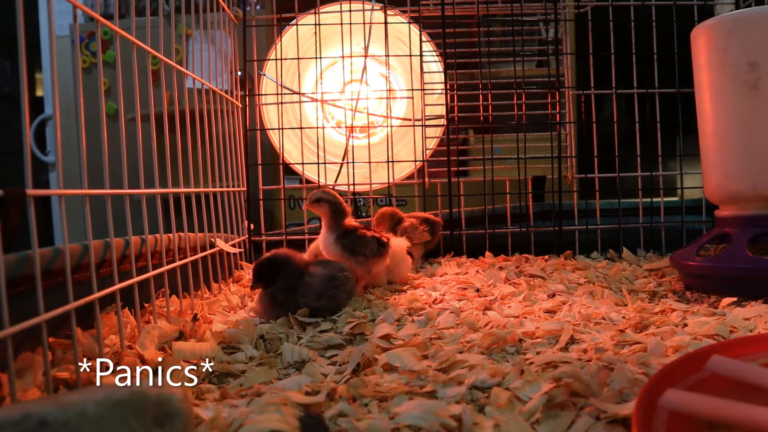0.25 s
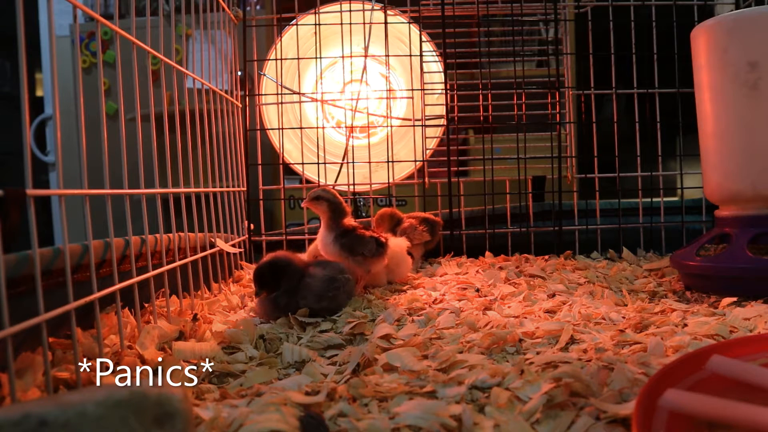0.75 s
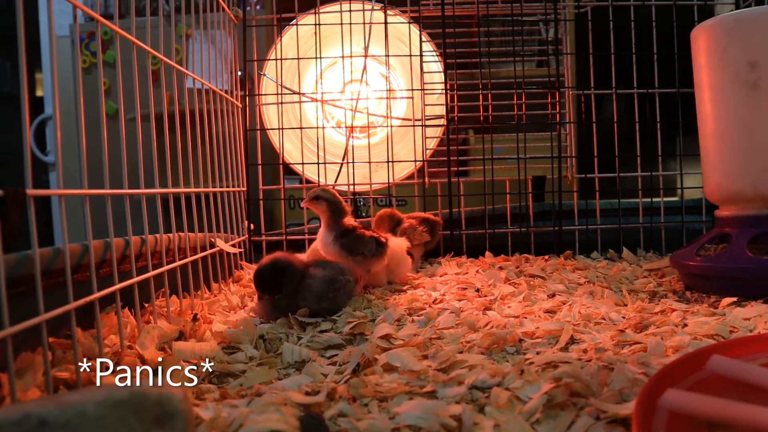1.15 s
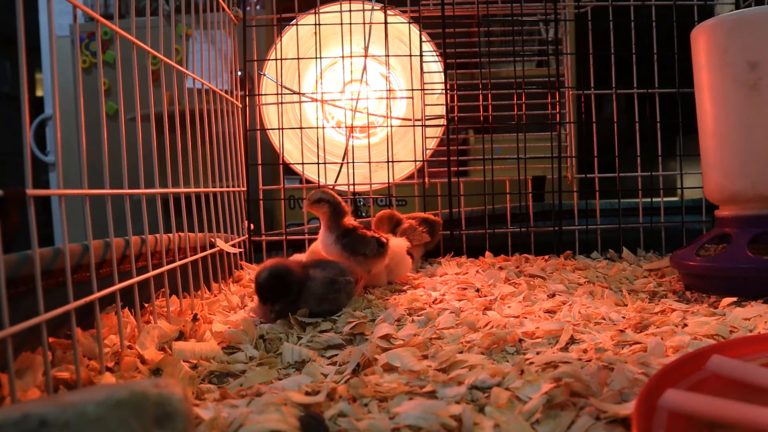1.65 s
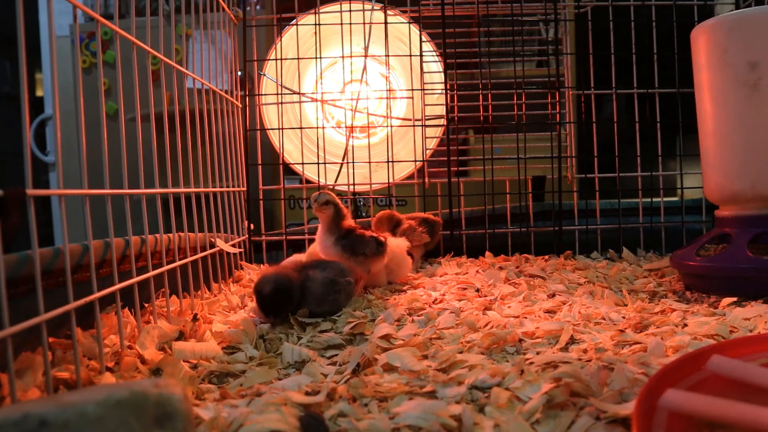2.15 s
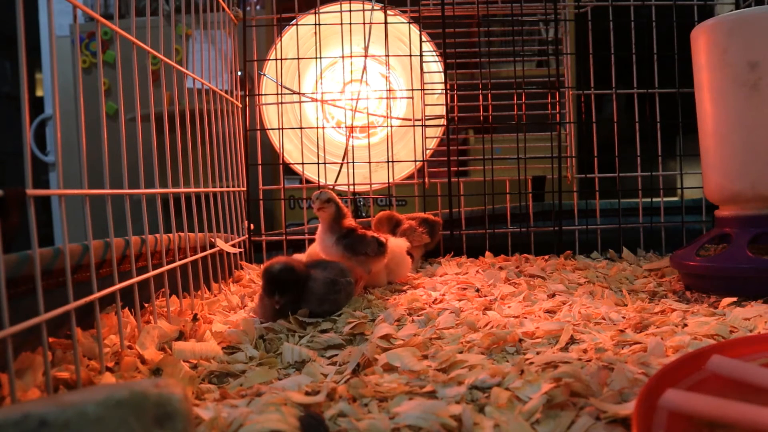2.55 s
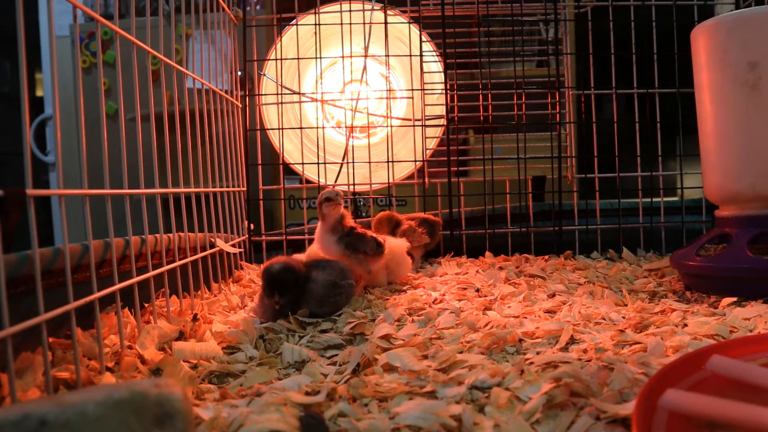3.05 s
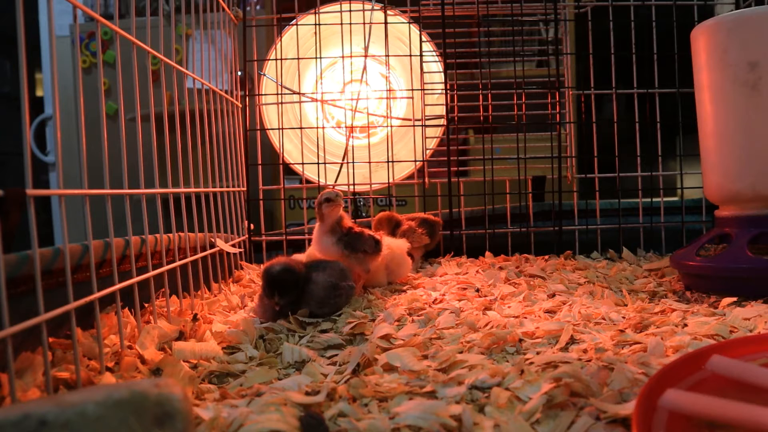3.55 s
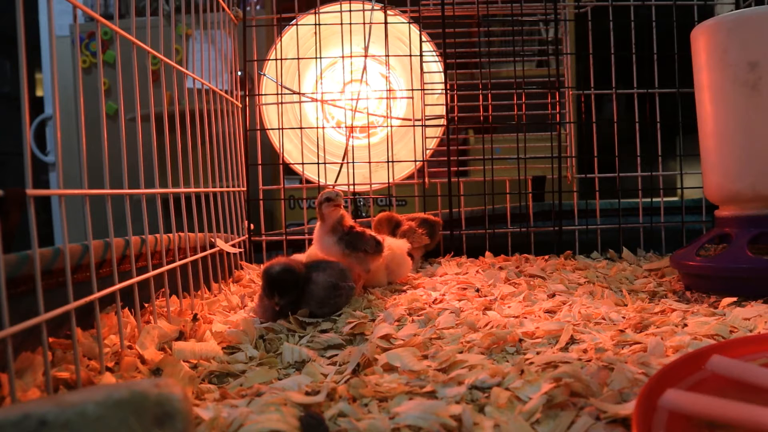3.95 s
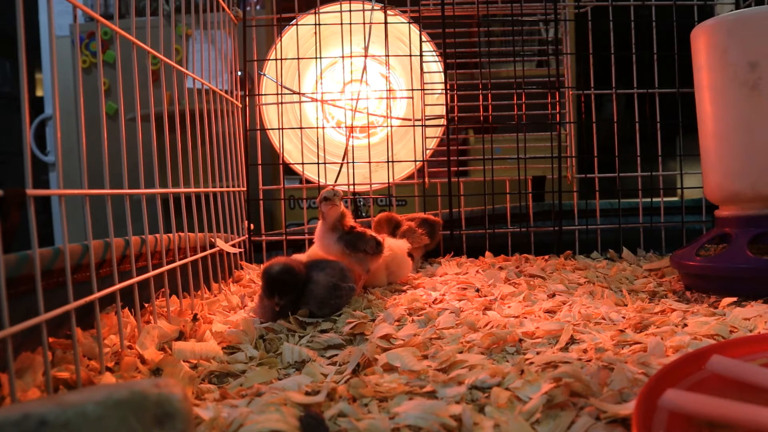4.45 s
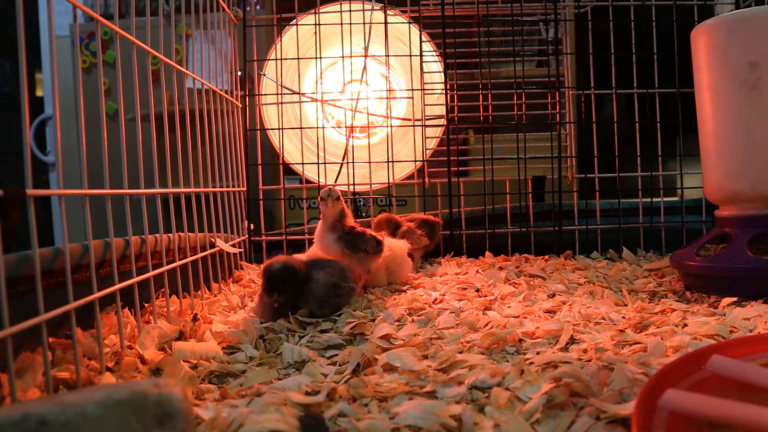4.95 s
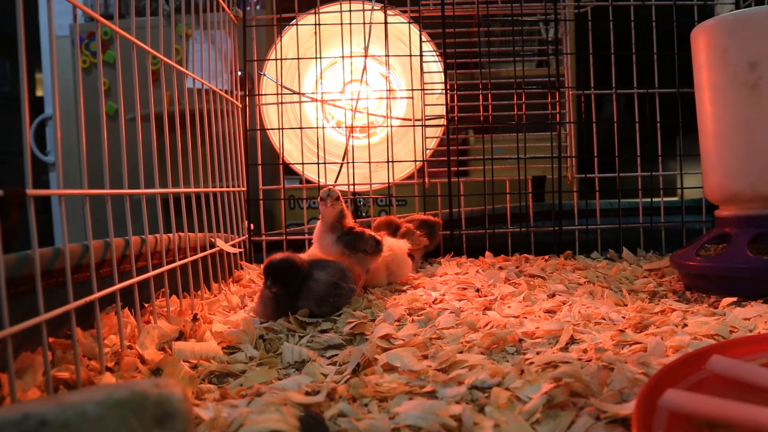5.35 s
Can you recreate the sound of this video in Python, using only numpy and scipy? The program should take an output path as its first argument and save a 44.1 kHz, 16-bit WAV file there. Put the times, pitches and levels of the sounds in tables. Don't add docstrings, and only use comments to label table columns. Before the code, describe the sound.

A faint low fan hum with mains tones opens the scene, and a tiny bedding tick and a soft distant cluck come at 0.3 s. The first loud chick peep arrives at about 0.5 s, then others near 0.8, 1.4 and 1.85 s. From 2.2 s they come steadily, about every third of a second, until 4.6 s, with the last two at 5.05 and 5.4 s. Each lasts around a tenth of a second: a thin, reedy two-toned start near 6 kHz, a swift slide to a strong whistle around 4.5 kHz, then an abrupt downward snap. Later peeps sound brighter and fall deeper. Short echoes and a brief tail suggest a small indoor enclosure. Very faint hen clucks occur near 0.7-0.9, 1.75, 2.5 and 5 s; dry shavings tick around 2.2, 2.9, 3.0 and 5.1 s. The hum dips slightly after each peep.

```python
import sys
import numpy as np
from scipy import signal
from scipy.fft import rfft, irfft, next_fast_len
from scipy.io import wavfile
from scipy.ndimage import uniform_filter1d

SR = 44100
rng = np.random.default_rng(int(sys.argv[2]) if len(sys.argv) > 2 else 0)


def volts_from_db(level):
    exponent = np.asarray(level, float) / 20
    return 10 ** exponent


def file_out(sig):
    cols = np.atleast_2d(sig).T
    lim = np.clip(cols, -1, 1)
    pcm = np.round(lim * 32767).astype(np.int16)
    wavfile.write(sys.argv[1], SR, pcm)


N = 246959


def rms_one(x):
    return x / np.sqrt(np.mean(x ** 2) + 1e-20)


def in_time(rows, t):
    first, *columns = np.transpose(rows)
    return [np.interp(t, first, c) for c in columns]


def at_hz(points, hz):
    table = np.array(points)
    return np.interp(np.log(hz), np.log(table[:, 0]), table[:, 1])


def filtered(order, hz, kind, x):
    return signal.sosfilt(signal.butter(order, hz, kind, fs=SR, output="sos"), x)


def drift(rate_hz, size):
    r = np.exp(-2 * np.pi * rate_hz / SR)
    run_in = int(SR / rate_hz)
    noise = rng.standard_normal(size + run_in)
    return rms_one(signal.lfilter([1], [1, -2 * r, r * r], noise)[run_in:])


# frequency in Hz, density in dB per Hz.
FAN_SPECTRUM = [(15, -54), (25, -34.5), (55, -5.5), (86, -18), (113, -5), (178, -9.5), (221, -4),
                (289, -10), (469, -10.5), (684, -26.5), (804, -19), (4260, -27.5), (10100, -41.5),
                (15500, -72.5)]
# frequency in Hz, likeness from -1 to 1.
LIKENESS = [(60, 0.93), (130, 0.94), (290, 0.87), (640, 0.12), (1410, -0.43), (3100, -0.5), (6820, -0.53),
            (15000, -0.57)]


def fan(patchy_db):
    out = 0
    edges_hz = 22 * 2 ** np.arange(0, 9.6, .5)
    white = rng.standard_normal((2, 2, N))
    flicker = [drift(27, N), drift(5, N), drift(20, N)]
    for k, (low, high) in enumerate(zip(edges_hz, edges_hz[1:])):
        mid, side = filtered(2, [low, high], "band", white[k % 2])
        hz = np.sqrt(low * high)
        alike = np.clip(at_hz(LIKENESS, hz), -1, 1)
        gain = volts_from_db(at_hz(FAN_SPECTRUM, hz) + patchy_db * flicker[k % 3])
        out = out + gain * (np.sqrt(1 + alike) * mid + np.sqrt(1 - alike) * side * [[1], [-1]])
    return rms_one(out)


# frequency in Hz, level in dB.
HUM_TONES = [(59.2, -65.5), (118.4, -54), (220.7, -53), (473.7, -65)]


def hum(wander_db):
    t = np.arange(N) / SR
    out = 0
    for hz, db in HUM_TONES:
        level = volts_from_db(db + wander_db * drift(1.8, N))
        out = out + np.sqrt(2) * level * np.sin(2 * np.pi * hz * t)
    return out


BACKGROUND_DB, SINK_DB, RECOVER_S = -46, 1.68, 0.95


def background_db():
    since_s = np.arange(N) / SR - np.array(PEEPS)[:, 1:2]
    sink = (since_s > 0) * np.exp(-np.abs(since_s) / RECOVER_S)
    return BACKGROUND_DB - SINK_DB * np.sum(sink, axis=0)


# start in seconds, length in seconds, pitch in Hz, level in dB, left share 0-1.
CLUCKS = [
    (0.302, .07, 802, -55, 0.3),
    (0.719, .06, 730, -56.5, 0.4),
    (0.819, .09, 715, -55.5, .5),
    (1.753, .14, 707, -58.5, .8),
    (2.523, .11, 711, -57.5, .8),
    (2.54, .1, 814, -57.5, .6),
    (4.956, .08, 557, -61, 0.4),
]


def clucks():
    out = np.zeros((2, N))
    for start_s, length_s, hz, level_db, left in CLUCKS:
        t = np.arange(round(length_s * SR)) / SR
        phase = 2 * np.pi * hz * t + 0.8 * drift(25, len(t)) + np.array([[0], [1.6]])
        share = np.sqrt(np.clip([[left], [1 - left]], 0, 1))
        tone = np.hanning(len(t)) ** .5 * np.sin(phase)
        out[:, round(start_s * SR):][:, :len(t)] += 2 * volts_from_db(level_db) * share * tone
    return out


# start in seconds, peak in dB, T60 in seconds.
TICKS = [
    (0.31, -37, .01),
    (2.213, -50, .08),
    (2.871, -39, .01),
    (2.983, -32, 0.1),
    (5.1, -54.5, 0.072),
]


def ticks():
    out = np.zeros((2, N))
    t = np.arange(3000) / SR
    for start_s, peak_db, t60_s in TICKS:
        envelope = volts_from_db(peak_db - 60 * t / t60_s) * np.minimum(8 * t / t60_s, 1)
        out[:, round(start_s * SR):][:, :len(t)] += envelope * rng.standard_normal((2, len(t)))
    return filtered(1, [450, 5000], "band", out)


REST_HZ, REST_SHARE = 5952, .62
OPEN_S, OPEN_DB, ONSET_DB, KNEE_DB = .008, -38.5, -47.5, -32
SHOULDER_S = .008
SLIDE_HZ_PER_S, BEND_S, BEND_HZ, BEND_DB = 45000, .016, 5265, -22.5
SETTLE_HZ, SETTLE_DB, NOTE_DB = 4820, -12, -8.5
SAG_S, SAG_HZ, SAG_DB, SNAP_HZ, SNAP_DB = .008, 190, -10.5, 4117, -10.5
DROP_S, BREAK_HZ, DROP_DB, END_DB = 0.0026, 1850, -18.5, -36.5


def lower_voice(start, settle, snap, open_hz, last_hz, note_hz, open_db, release_s):
    knee = settle - BEND_S - (open_hz - BEND_HZ) / SLIDE_HZ_PER_S
    rise_hz, fall_hz = REST_SHARE * (open_hz - REST_HZ), SNAP_HZ - last_hz
    return np.array([
        (start, open_hz - rise_hz, ONSET_DB + open_db),
        (min(start + OPEN_S, knee - SHOULDER_S), open_hz - rise_hz / 2, OPEN_DB + open_db),
        (knee - SHOULDER_S, open_hz, KNEE_DB - 2 + open_db),
        (knee + SHOULDER_S / 2, open_hz - SLIDE_HZ_PER_S * SHOULDER_S / 2, KNEE_DB + 1.5 + open_db / 2),
        (settle - BEND_S, BEND_HZ, BEND_DB),
        (settle, SETTLE_HZ, SETTLE_DB),
        ((settle + snap) / 2, note_hz, NOTE_DB),
        (snap - SAG_S, note_hz - SAG_HZ, SAG_DB),
        (snap, SNAP_HZ, SNAP_DB),
        (snap + DROP_S, SNAP_HZ - fall_hz ** 2 / BREAK_HZ, DROP_DB),
        (snap + release_s, last_hz, END_DB)])


ARCH_HZ, ARCH_SHARE, ARCH_ONSET_DB, ARCH_RISE_DB, CREST_DB = 497.3, .5, -50, -40.5, -34
CHASE_S, CHASE_HZ, CHASE_DB, QUIT_S, QUIT_HZ, QUIT_DB = 0.015, 5904, -28.5, .007, 5580, -32.5


def upper_voice(start, settle, crest_hz, open_db):
    rise_s = ARCH_SHARE * (settle - CHASE_S - start)
    return np.array([
        (start, crest_hz - ARCH_HZ, ARCH_ONSET_DB + open_db),
        (start + rise_s / 2, crest_hz - ARCH_HZ / 5, ARCH_RISE_DB + open_db),
        (start + rise_s, crest_hz, CREST_DB + open_db),
        (settle - CHASE_S, CHASE_HZ, CHASE_DB),
        (settle - QUIT_S, QUIT_HZ, QUIT_DB)])


def voice(rows, t, fade_s):
    hz, level_db = (uniform_filter1d(c, size=90) for c in in_time(rows, t))
    fade_in = (t - rows[0][0]) / 0.0021 + 1
    fade_out = (rows[-1][0] - t) / fade_s + 1
    gate = np.clip(np.minimum(fade_in, fade_out), 0, 1)
    wobble = 1 + 0.0042 * drift(100, len(t))
    phase = np.cumsum(2 * np.pi * hz * wobble / SR)
    return hz, phase, np.sqrt(2) * volts_from_db(level_db) * gate ** 2


def flutter_noise(cut_hz, size):
    low_pass = signal.butter(4, cut_hz, fs=SR, output="sos")
    smooth = signal.sosfiltfilt(low_pass, rng.standard_normal((2, size)))
    return rms_one(smooth[0]) + 1j * rms_one(smooth[1])


# pitch in Hz, second harmonic in dB, third in dB.
OVERTONES = [(3020, -11.5, -39.5), (3320, -23.5, -53.5), (3640, -42, -59), (3980, -33.5, -37.5),
             (4657, -24, -49.5), (4800, -33.5, -48), (5510, -33, -33.5), (5570, -12.5, -38.5),
             (6100, -18.5, -47.5)]
# lower pitch in Hz, roughness 0-1.
ROUGHNESS = [(4800, .07), (5100, .16), (5500, .2), (5900, .11), (6500, .05)]
# time in seconds, overtone gain in dB.
FACING = [(0, -4), (2, -2.5), (2.2, -0.5), (3.5, 0), (5.6, 3.5)]
# multiple of lower, multiple of upper, level in dB.
SIDE_TONES = [(2, -1, -10.5), (3, -2, -19), (-1, 2, -22), (1, 1, -18.5), (3, -1, -28.5), (0, 2, -27),
              (4, -2, -33.5)]
RASP = 2.1
DRIVE_DB, DRIVE_POWER = -24, 0.3


def peep(lower, upper, t):
    hz, phase, height = voice(lower, t, fade_s=0.0066)
    _, high_phase, high_height = voice(upper, t, fade_s=0.009)
    second_db, third_db = in_time(OVERTONES, hz)
    rough, = in_time(ROUGHNESS, hz)
    facing_db, = in_time(FACING, t)
    both_sound = uniform_filter1d(1. * (high_height > 0), size=600)
    rough = rough * both_sound
    flutter = 1 + rough * flutter_noise(1100, len(t))
    breathy = np.exp(.62 * flutter_noise(800, len(t)))
    rasp = flutter + RASP * rough * flutter_noise(1800, len(t))
    out = height * np.imag(flutter * np.exp(1j * phase))
    out += high_height * np.imag(flutter * np.exp(1j * high_phase))
    out += height * volts_from_db(second_db + facing_db) * np.imag(flutter * rasp * np.exp(2j * phase))
    out += height * volts_from_db(third_db - 6 + 2 * facing_db) * np.imag(breathy * np.exp(3j * phase))
    for low, high, tone_db in SIDE_TONES:
        order = low + high
        strength = np.sqrt(height * high_height) * volts_from_db(tone_db + facing_db * (order - 1.5))
        strength = strength * np.clip(height / volts_from_db(DRIVE_DB), 0, 2) ** (DRIVE_POWER * (order - 1))
        harshness = rasp if order > 1 else flutter
        tone = np.exp(1j * (low * phase + high * high_phase))
        out += strength * np.imag(flutter * harshness * tone)
    return out


def reflect(x, echoes, lag_ms):
    size = next_fast_len(len(x))
    turn_per_ms = -2j * np.pi * np.arange(size // 2 + 1) * SR / size / 1000
    paths = np.array([np.ones(len(turn_per_ms)), np.exp(turn_per_ms * lag_ms)])
    near = 1 + sum(np.exp(turn_per_ms * ms) * np.array([[left], [right]]) for ms, left, right in echoes)
    return irfft(rfft(x, size) * paths * near, size)[:, :len(x)]


# start, slide settling and voice snapping in seconds,
# opening pitch in Hz, last pitch in Hz.
PEEPS = [(0.479, 0.529, 0.584, 5600, 3680), (0.818, 0.888, 0.933, 5860, 3700),
         (1.444, 1.496, 1.547, 5553, 3510), (1.849, 1.911, 1.965, 6050, 3690),
         (2.177, 2.245, 2.298, 5823, 2920), (2.512, 2.583, 2.632, 5970, 2830),
         (2.916, 2.991, 3.040, 6000, 3630), (3.27, 3.345, 3.389, 6170, 3210),
         (3.598, 3.68, 3.727, 6183, 3010), (3.922, 4.003, 4.043, 6050, 2830),
         (4.261, 4.345, 4.389, 6154, 2770), (4.605, 4.683, 4.723, 6100, 2767),
         (5.050, 5.126, 5.179, 6250, 2740), (5.383, 5.458, 5.510, 6167, 2875)]
# upper crest in Hz, middle of the loud note in Hz, strength in dB,
# opening strength in dB, release in seconds.
EFFORT = [(6210, 4520, 0.2, 1, .021), (6800, 4450, -0.4, -1.7, 0.014), (6700, 4480, -0.6, -2.8, 0.014),
          (6990, 4450, -0.2, -4, .011), (6684, 4500, 0.24, 0, .012), (7160, 4520, -0.5, -2.5, 0.0081),
          (6550, 4540, -0.7, -1.5, 0.014), (7080, 4570, 0.3, 3, 0.0078), (7120, 4600, 0.3, 3.5, 0.014),
          (6900, 4560, 0.45, 0.5, 0.012), (7300, 4570, 0.34, 0, 0.0047), (7360, 4530, -0.45, .1, 0.014),
          (7100, 4550, 0.44, -3, 0.014), (7210, 4660, 0.35, 0.5, 0.024)]
# delay in ms, left gain, right gain.
AWAY = [(0.075, 0.58, 0.11), (0.438, -0.799, 0.11), (1.871, 0.341, 0.059), (2.981, 0.432, 0.142),
        (4.018, -0.041, 0.154), (8.045, -0.107, 0.086)]
# delay in ms, left gain, right gain.
TURNING = [(0.075, 0.58, 0.11), (0.438, -0.799, 0.11), (1.842, -0.459, 0.224), (2.524, -0.113, -0.303),
           (3.383, -0.459, 0.071), (7.763, 0.207, 0.034)]
# delay in ms, left gain, right gain.
SIDEWAYS = [(0.23, -0.544, -0.361), (0.346, 0.148, -0.537), (2.141, 0.412, -0.183), (2.859, 0.659, 0.018),
            (3.219, 0.377, -0.236), (5.448, -0.197, 0.041)]
# delay in ms, left gain, right gain.
TOWARDS = [(0.23, -0.544, -0.361), (0.346, 0.148, -0.537), (2.046, -0.255, 0.282), (3.212, 0.444, -0.458),
           (2.967, -0.826, 0.132), (5.353, 0.149, -0.03)]
# peeps held, reflections, lag of the right side in ms.
POSTURES = [(3, AWAY, .227), (1, TURNING, .233), (4, SIDEWAYS, .207), (6, TOWARDS, .21)]


def chick():
    out = np.zeros((3, N))
    poses = [(echoes, lag_ms) for count, echoes, lag_ms in POSTURES for _ in range(count)]
    for timing, effort, pose in zip(PEEPS, EFFORT, poses):
        start, settle, *_ = timing
        crest_hz, note_hz, strength_db, open_db, release_s = effort
        lower = lower_voice(*timing, note_hz, open_db, release_s)
        upper = upper_voice(start, settle, crest_hz, open_db)
        span = np.arange(round(lower[0][0] * SR) - 800, round(lower[-1][0] * SR) + 800)
        call = volts_from_db(strength_db) * peep(lower, upper, span / SR)
        out[:, span] += np.vstack([call, reflect(call, *pose)])
    facing_db, = in_time(FACING, np.arange(N) / SR)
    beak = filtered(2, [10800, 13200], "band", out + 1e-18)
    return filtered(4, 2500, "high", out + (1.1 * volts_from_db(facing_db) - .55) * beak)


ROOM_T60_S, SHED_T60_S, ROOM_DB = 0.15, 0.31, -19.5


def brooder(dry, *near):
    size = next_fast_len(N + SR // 2)
    t = np.arange(SR // 2) / SR
    decay = volts_from_db(-60 * t / ROOM_T60_S) + volts_from_db(-14 - 60 * t / SHED_T60_S)
    tail = rng.standard_normal((2, len(t))) * decay * np.clip(t / 0.0064 - 1, 0, 1)
    tail = filtered(2, [3700, 12500], "band", tail)
    tail = volts_from_db(ROOM_DB) * tail / np.sqrt(np.sum(tail[0] ** 2))
    return volts_from_db(-1) * np.array(near) + irfft(rfft(dry, size) * rfft(tail, size), size)[:, :N]


def scene():
    room_tone = volts_from_db(-0.5) * fan(patchy_db=2.43) + volts_from_db(47.5) * hum(wander_db=1)
    peeps = brooder(*chick())
    loudness = np.sqrt(np.abs(uniform_filter1d(peeps[0] ** 2, size=1500)))
    duck = volts_from_db(-7.5 * np.clip(loudness / 0.3, 0, 1))
    bright = filtered(2, 900, "high", room_tone)
    room_tone = room_tone - bright + duck * bright
    return peeps + clucks() + ticks() + volts_from_db(background_db()) * room_tone


def top_cut(x):
    return signal.sosfilt(signal.butter(12, 15690, fs=SR, output="sos"), x)


CUTOFF_HZ = 15800


def record(dry):
    cut = signal.sosfilt(signal.cheby2(12, 70, CUTOFF_HZ, fs=SR, output="sos"), dry)
    return top_cut(cut)


dry = scene()
out = record(dry)
file_out(out)
```